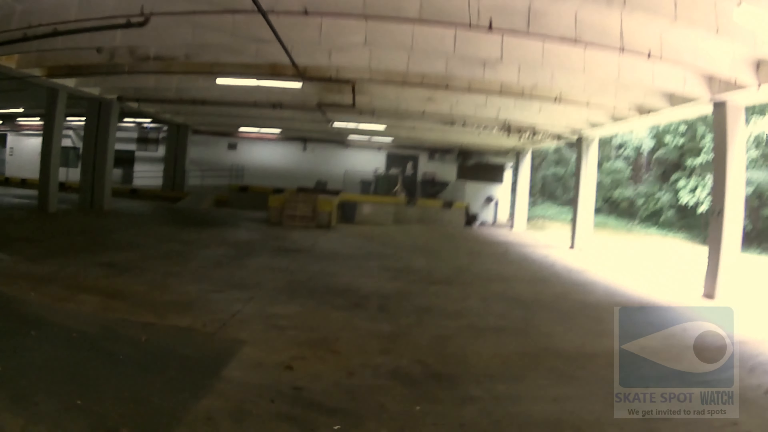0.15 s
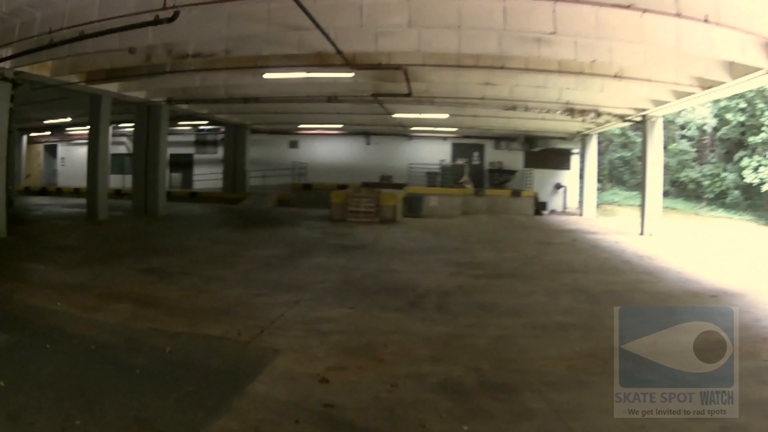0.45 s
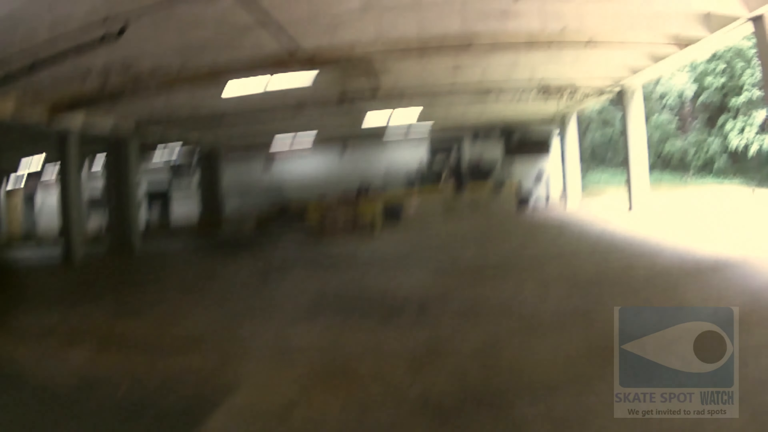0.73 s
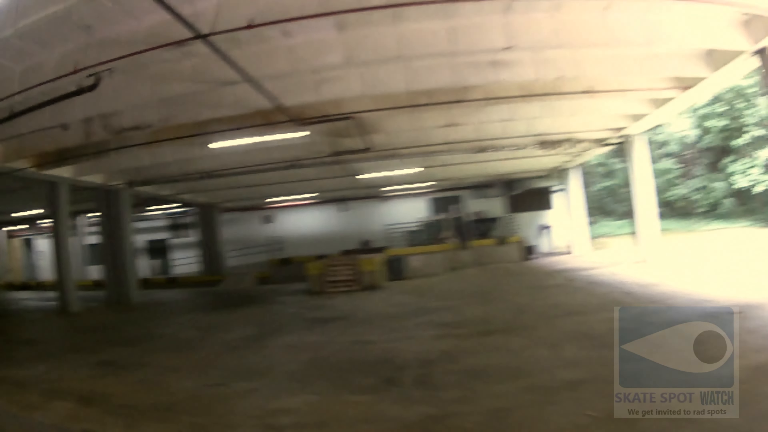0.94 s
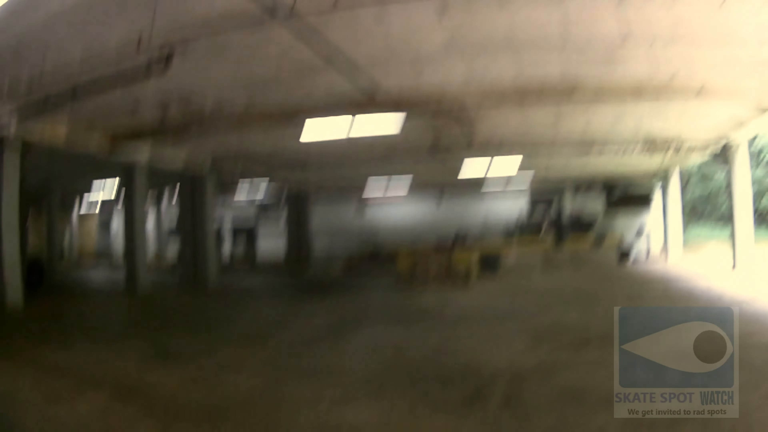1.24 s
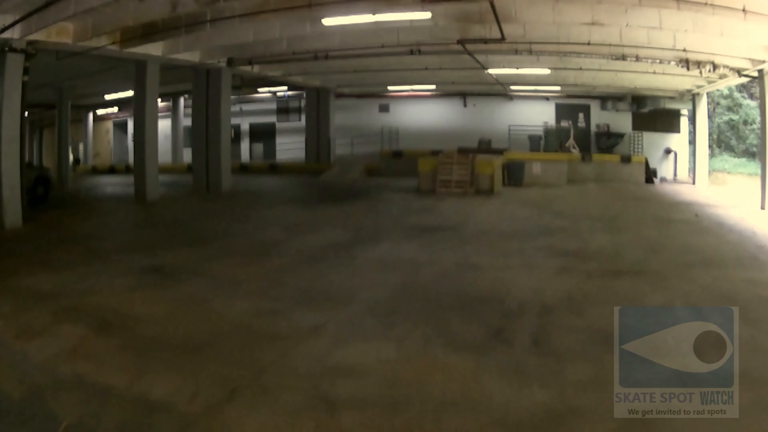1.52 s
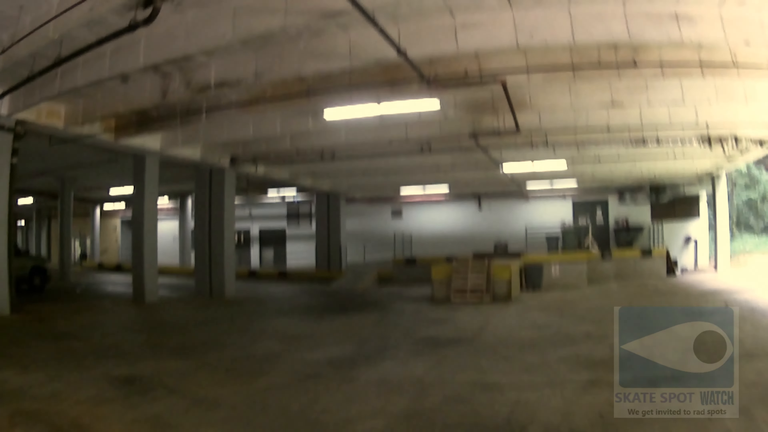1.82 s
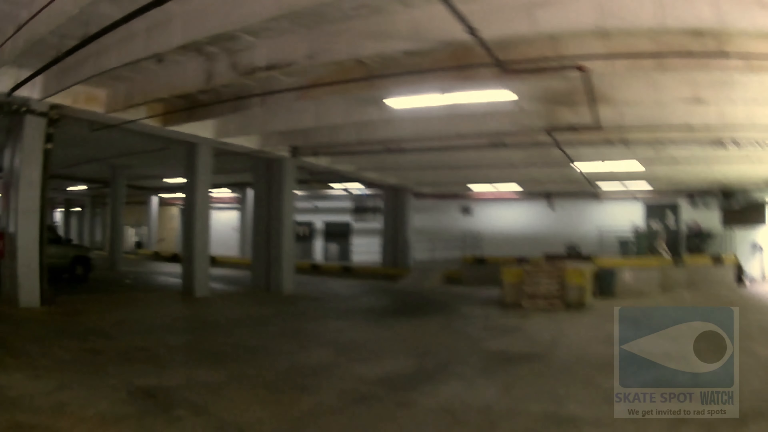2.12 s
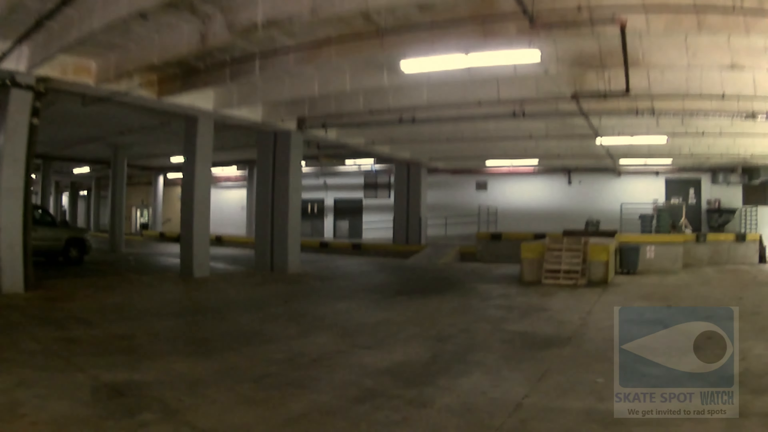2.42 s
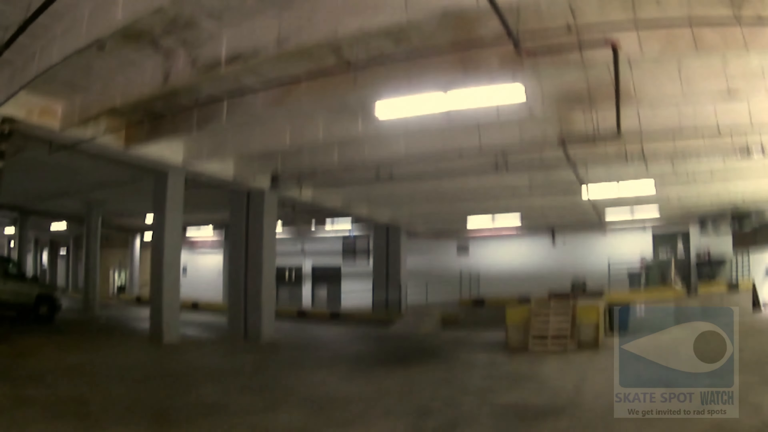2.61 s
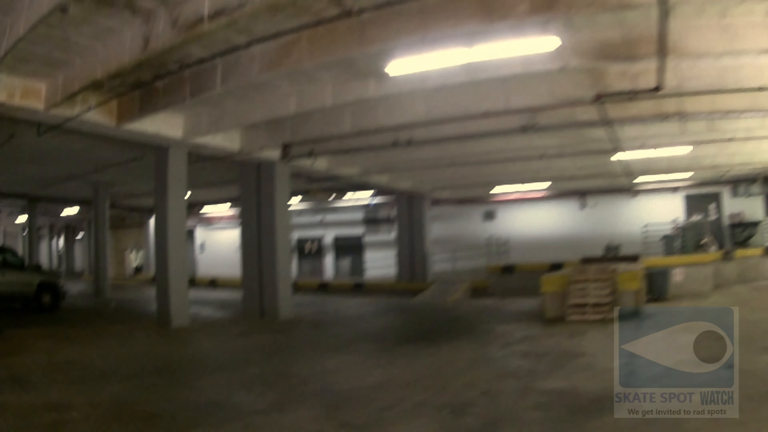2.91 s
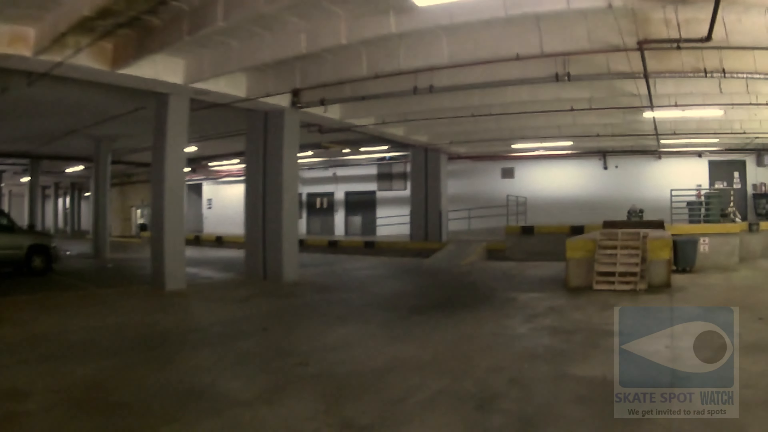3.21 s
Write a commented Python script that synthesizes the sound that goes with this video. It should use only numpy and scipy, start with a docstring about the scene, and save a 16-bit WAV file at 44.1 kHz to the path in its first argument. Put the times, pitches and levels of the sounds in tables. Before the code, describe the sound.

Skateboard wheels rumble and clatter over a concrete garage floor, muffled, boxy, with hard knocks

```python
"""First heard is the low rumble and gritty clatter of a skateboard on a concrete garage floor, from a camera
in a closed housing carried on the ride. Random taps of grit excite the modes of deck and housing, a crackly
scrape leaks through, and bumps add band-limited pulses; shaped noise gives rumble, a growing drone, roar and hiss.
The camera samples its one microphone slowly, clips the hardest jolts and holds each sample, which mirrors
the roll in the treble."""
import sys
import numpy as np
from scipy import signal
from scipy.fft import rfft, irfft, next_fast_len
from scipy.io import wavfile
from scipy.ndimage import uniform_filter1d, map_coordinates

SR = 44100
rng = np.random.default_rng(int(sys.argv[2]) if len(sys.argv) > 2 else 0)


def transcribe(signal):
    """Save signal, clipped to [-1, 1], as a 16-bit WAV file at the path in sys.argv[1]."""
    frames = np.atleast_2d(signal).T
    limited = np.clip(frames, -1, 1)
    pcm = np.round(limited * 32767).astype(np.int16)
    wavfile.write(sys.argv[1], SR, pcm)


def ratio_of_db(decibels):
    """Turn decibels (scalar or array-like) into linear amplitude factors; 0 dB maps to 1."""
    return 10 ** (np.asarray(decibels, float) / 20)


N = 147735  # samples

# Strength of the ride, before dips under the jolts: time_s, roll_rms_db, rumble_rms_db
RIDE = [(0.0, -27.5, -28), (0.38, -29, -27.5), (0.54, -17.5, -23), (0.59, -16.5, -36), (0.7, -16.5, -34),
        (0.83, -14, -13.5), (0.88, -20, -32), (0.94, -21.5, -19.5), (1.1, -16.5, -19), (1.17, -20, -25.5),
        (1.22, -16, -20.5), (1.32, -21.5, -23.5), (1.34, -13.5, -23.5), (1.6, -17.5, -25.5),
        (1.62, -17.5, -40), (1.72, -16, -19), (1.95, -16, -18.5), (2.01, -22, -22.5), (2.08, -17.5, -21),
        (2.11, -19, -16), (2.29, -15, -16), (2.35, -13.5, -21.5), (2.47, -23, -29), (2.53, -14, -21),
        (2.54, -19.5, -31), (2.7, -17.5, -17.5), (3.27, -18, -31.5), (3.31, -14.5, -25.5),
        (3.35, -16.5, -29)]
# Roughness of the floor: time_s, scrape_rms_db
ROUGHNESS = [(0, -48), (.18, -60), (.4, -54), (.47, -48.5), (.58, -41.5), (.68, -40), (.72, -52),
             (.86, -43), (.92, -51.5), (1.13, -49), (1.35, -51.5), (1.48, -40.5), (1.57, -42.5),
             (1.66, -46), (1.97, -50.5), (2.05, -58), (2.25, -48), (2.4, -47.5), (2.51, -40.5), (2.55, -53),
             (2.74, -54.5), (3.04, -49.5), (3.2, -46.5), (3.27, -43.5), (3.3, -35.5), (3.35, -57)]
# Joints and bumps: start_s, swing_peak_db (before JOLT_DB is added), tick_peak_db
JOLTS = [(0.432, -13, -41), (0.454, -12.5, -49), (0.539, -10.5, -41), (0.559, -5.5, -48), (0.639, -7, -50),
         (0.683, -5, -33), (0.769, -12, -50), (0.865, -8.5, -35), (1.03, -7.5, -33), (1.071, -13, -46),
         (1.101, -6, -41), (1.135, -6, -57), (1.209, -10, -46), (1.225, -1.5, -22), (1.251, -8, -28),
         (1.334, -14, -57), (1.525, -14, -48), (1.593, -4, -52), (1.766, -11, -55), (2.207, -11, -51),
         (2.275, -7.5, -53), (2.31, -13, -45), (2.3465, -7, -42), (2.3648, -2, -25), (2.507, -9, -36),
         (2.5196, -3.5, -50), (2.521, -4, -22), (2.989, -7, -49), (3.048, -6, -45), (3.0639, -6.5, -30),
         (3.089, -4, -38), (3.184, -5, -48), (3.3085, -4.5, -42), (3.334, -7.5, -39)]
# Modes of deck and housing: mode_hz, width_hz, level_db
BODY_MODES = [(229, 51.6, -7.5), (268.7, 37, -6.5), (366.6, 60, -3.5), (468, 47.3, 0), (534.6, 49.5, 1),
              (633.3, 46.3, 0.5), (688.3, 48, -2), (765, 87, -4.5), (971, 39, -7.5), (1127, 86, -15.5)]
# Relative spectra, each scaled to rms 1 before its level is set: frequency_hz, density_db (per Hz)
SCRAPE_SPECTRUM = [(1000, -4), (1300, 3.5), (1600, -2), (2100, -4.5), (2700, -13), (3200, -20.5),
                   (5000, -21)]
RUMBLE_SPECTRUM = [(20, -17), (59, -6), (81, -2), (100, -4.5), (111, 6), (125, 3), (172, 2), (204, -3),
                   (226, -1), (253, -7.5), (300, -2.5), (390, -47)]
DEEP_SPECTRUM = [(15, -13), (40, -7.5), (65, -3), (95, -17)]
ROAR_SPECTRUM = [(150, -16), (600, 6.5), (1100, -3), (1450, -20), (1900, -32)]
HISS_SPECTRUM = [(2500, -6), (3300, -15), (4200, -5.5), (5000, -16), (5900, -27.5)]
FIZZ_SPECTRUM = [(20, 23.5), (300, 1), (1200, -5), (4000, -2), (9000, -4), (16000, -7)]

GRIT_PER_S, GRIT_SPREAD_DB, GRIT_MOST_DB = 900, 2, 7.5  # the cap, less the spread, also serves the crackle
ROUGH_DB, FINE_DB = 0.34, -3.5  # depth of the roughness curves; fine sand beside grit
WAVER_DB, WAVER_PER_S = 2, 4.995  # each mode swells and fades by itself as the load shifts
CRACKLE_PER_S, CRACKLE_SPREAD_DB, SMOOTH_DB = 600, 2.5, -3.5
SCRAPE_FOLLOW_POWER, SCRAPE_FOLLOW_S = 0.85, 0.0065
SCRAPE_WOBBLE_DB, SCRAPE_WOBBLE_PER_S = 0.8, 25.32
MUFFLE_HZ = 1313
JOLT_HZ, JOLT_WIDTH_HZ, JOLT_DB, JOLT_RING_DB = 629, 530, 1.66, -24  # width of one of four stages
TICK_HZ, TICK_WIDTH_HZ, TROUGH_LATE_S = 2300, 2200, 0.0017
CHOKE_S, CHOKE_DB = 0.003, -9
DEEP_START_DB, DEEP_DB_PER_S = -46.5, 5
ROAR_DB, HISS_DB = -34.5, -61.5
FUZZ_DB, LEVEL_WINDOW_S = -38, 0.0031  # fuzz relative to the running level
CLIP_TOP, CLIP_HARDNESS = 0.83, 18  # ceiling as a fraction of full scale; sharpness of the knee
SLOW_UP, SLOW_DOWN, HOLD = 40, 147, 4  # 44.1 kHz to 12 kHz; steps per held sample
FIZZ_DB, APART_DB = -36.5, -36  # relative to the running level: same in both channels, opposite
FLICKER_PER_S, FLICKER_DB = 16, 22


def wheels():
    """Modal excitation: grit and fine sand ring the body; a scrape bites harder while it rings."""
    rough = ratio_of_db(ROUGH_DB * (wobble(16) + wobble(46.1)))
    grit = rough * (grains(GRIT_PER_S, GRIT_SPREAD_DB) + ratio_of_db(FINE_DB) * rng.standard_normal(N))
    rung = np.zeros(N)
    for k, (hz, width_hz, db) in enumerate(BODY_MODES):
        push = grit * ratio_of_db(WAVER_DB * wobble(WAVER_PER_S))
        # neighbouring modes alternate in sign
        rung += (-1) ** k * ratio_of_db(db) * filtered(push, lambda f: peak(f, hz, width_hz))
    roll = unit(filtered(rung, muffle))

    crackle = grains(CRACKLE_PER_S, CRACKLE_SPREAD_DB) + ratio_of_db(SMOOTH_DB) * rng.standard_normal(N)
    bite = running_level(roll, SCRAPE_FOLLOW_S) ** SCRAPE_FOLLOW_POWER
    uneven = ratio_of_db(SCRAPE_WOBBLE_DB * wobble(SCRAPE_WOBBLE_PER_S))
    scrape = coloured(bite * rough * uneven * crackle, SCRAPE_SPECTRUM)
    return ratio_of_db(along(RIDE, col=1)) * choke() * roll + ratio_of_db(along(ROUGHNESS, col=1)) * scrape


def jolts():
    """Impulse response: each bump gives a short swing about one deep trough, a weak ring and a thin tick."""
    blows, ticks, impulse = np.zeros((3, N))
    impulse[0] = 1
    for start_s, db, tick_db in JOLTS:
        blows[round(start_s * SR)] = ratio_of_db(db + JOLT_DB)
        ticks[round((start_s + TROUGH_LATE_S) * SR)] = ratio_of_db(tick_db)

    def swing(f):
        """Linear phase: a pulse symmetric about its delayed trough."""
        delay = np.exp(-2j * np.pi * f * TROUGH_LATE_S)
        return -np.abs(muffle(f) * peak(f, JOLT_HZ, JOLT_WIDTH_HZ) ** 4) * delay

    def tick(f):
        """Zero phase: a pulse symmetric about its own instant."""
        return np.abs(peak(f, TICK_HZ, TICK_WIDTH_HZ)) ** 2

    parts = [(blows, swing), (ratio_of_db(JOLT_RING_DB) * blows, body), (ticks, tick)]
    # each response is scaled to a peak of 1
    return sum(filtered(x, h) / np.abs(filtered(impulse, h)).max() for x, h in parts)


def choke():
    """Amplitude modulation: a gain that dips for a moment while a jolt swings."""
    t = np.arange(N) / SR
    dips = sum(np.exp(-((t - row[0] - CHOKE_S / 2) / CHOKE_S) ** 2) for row in JOLTS)
    return ratio_of_db(CHOKE_DB * np.minimum(dips, 1))


def rumble():
    """Shaped noise: low rumble from floor and air, and a deep drone that grows further into the garage."""
    deep_gain = ratio_of_db(DEEP_START_DB + DEEP_DB_PER_S * np.arange(N) / SR)
    deep = deep_gain * coloured(rng.standard_normal(N), DEEP_SPECTRUM)
    return deep + ratio_of_db(along(RIDE, col=2)) * coloured(rng.standard_normal(N), RUMBLE_SPECTRUM)


def garage_roar():
    """Diffuse sound: a steady band of noise stands for the garage echoing the ride."""
    return ratio_of_db(ROAR_DB) * coloured(rng.standard_normal(N), ROAR_SPECTRUM)


def hiss():
    """Stationary noise: a faint steady hiss in the treble."""
    return ratio_of_db(HISS_DB) * coloured(rng.standard_normal(N), HISS_SPECTRUM)


def body(f):
    """Modal superposition: the modes of deck and housing, heard through the housing."""
    return muffle(f) * sum((-1) ** k * ratio_of_db(db) * peak(f, hz, width_hz)
                           for k, (hz, width_hz, db) in enumerate(BODY_MODES))


def muffle(f):
    """Transmission loss: the housing cuts the treble as a steep sixth-order low-pass."""
    return signal.freqs(*signal.butter(6, MUFFLE_HZ, analog=True), worN=f)[1]


def peak(f, hz, width_hz):
    """Resonance: the complex response of one causal damped oscillator."""
    return 1j * f * width_hz / (hz * hz - f * f + 1j * f * width_hz)


def grains(per_s, spread_db):
    """Random impacts: taps of either sign, few large and many small, rms 1."""
    hit, size, sign = rng.random((3, N))
    size_db = np.minimum(-spread_db * np.log(size + 1e-6), GRIT_MOST_DB + spread_db)
    return unit((hit < per_s / SR) * ratio_of_db(size_db) * np.sign(sign - 0.5))


def coloured(x, points):
    """Spectral shaping: x filtered by (Hz, dB) points, closed at both ends, rms 1."""
    f, db = np.transpose(points)

    def response(hz):
        return ratio_of_db(np.interp(np.log(hz + 1), np.log(f + 1), db, -120, -120))

    return unit(filtered(x, response))


def filtered(x, response):
    """Convolution theorem: the spectrum of x times a complex response of frequency."""
    m = next_fast_len(N + SR // 2)
    return irfft(rfft(x, m) * response(np.fft.rfftfreq(m, 1 / SR)), m)[..., :N]


def wobble(rate):
    """Slow fluctuation: a smooth random curve with rate knots a second."""
    return map_coordinates(rng.standard_normal(int(N * rate / SR) + 4), [np.arange(N) * rate / SR])


def running_level(x, window_s):
    """Envelope: the mean magnitude of x over a sliding window."""
    return uniform_filter1d(np.abs(x), max(round(window_s * SR), 1))


def unit(x):
    """Normalisation: x at rms 1."""
    return x / np.sqrt(np.mean(x ** 2) + 1e-20)


def along(rows, col):
    """Linear interpolation: one column of a time table, per sample."""
    rows = np.array(rows)
    return np.interp(np.arange(N) / SR, rows[:, 0], rows[:, col])


def scene():
    """Superposition: all sources add at one microphone, copied to two channels."""
    mono = wheels() + jolts() + choke() * rumble() + garage_roar() + hiss()
    return np.array([mono, mono])


def top_cut(x):
    """Nothing passes above the cut-off."""
    return signal.sosfilt(signal.butter(12, 15770, fs=SR, output="sos"), x)


def record(dry):
    """Sampling and hold: 12 kHz samples are softly clipped and held, leaving mirror images in the treble."""
    level = running_level(dry[0], LEVEL_WINDOW_S)
    fuzzed = dry + ratio_of_db(FUZZ_DB) * level * rng.standard_normal(N)
    slow = signal.resample_poly(fuzzed, SLOW_UP, SLOW_DOWN, axis=1)
    clipped = slow / (1 + np.abs(slow / CLIP_TOP) ** CLIP_HARDNESS) ** (1 / CLIP_HARDNESS)
    steps = np.repeat(clipped, HOLD, axis=1)
    held = signal.resample_poly(steps, SLOW_DOWN, SLOW_UP * HOLD, axis=1)[:, :N]
    held = np.pad(held, ((0, 0), (0, N - held.shape[1])))

    # fizz follows the level; the part opposite in the two channels flickers downward
    shared = ratio_of_db(FIZZ_DB) * rng.standard_normal(N)
    flicker = ratio_of_db(APART_DB + FLICKER_DB * np.minimum(wobble(FLICKER_PER_S), 0))
    apart = flicker * coloured(rng.standard_normal(N), FIZZ_SPECTRUM) * np.array([[1], [-1]])
    mix = held + level * (shared + apart)
    return top_cut(mix)


dry = scene()
out = record(dry)
transcribe(out)
```